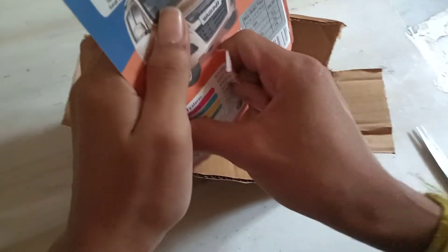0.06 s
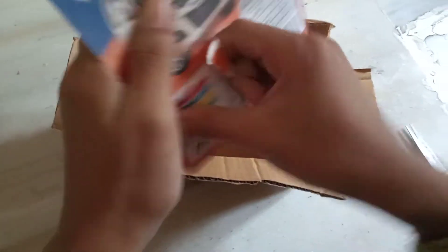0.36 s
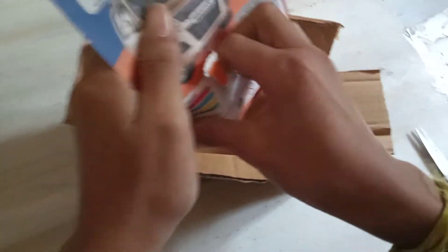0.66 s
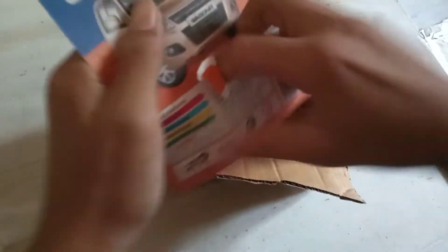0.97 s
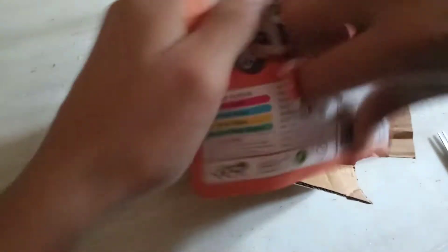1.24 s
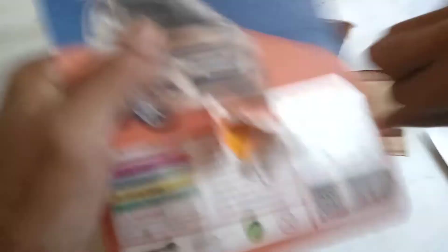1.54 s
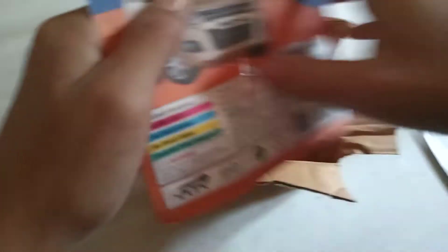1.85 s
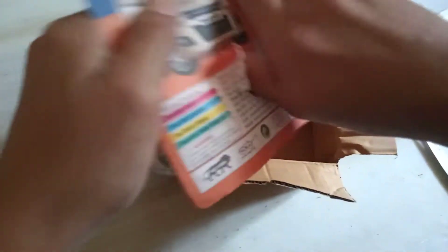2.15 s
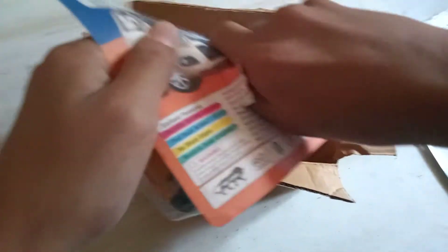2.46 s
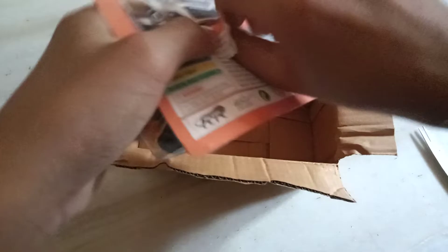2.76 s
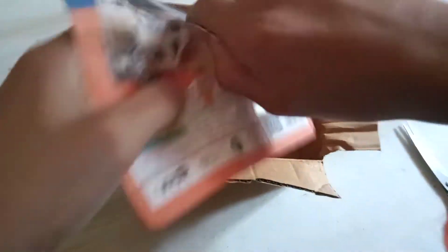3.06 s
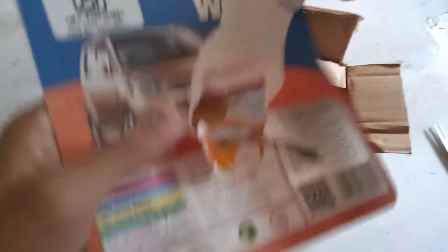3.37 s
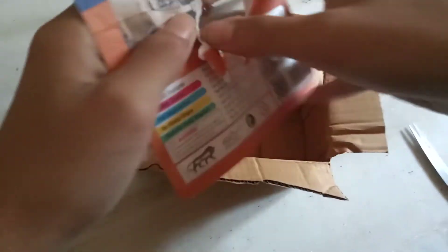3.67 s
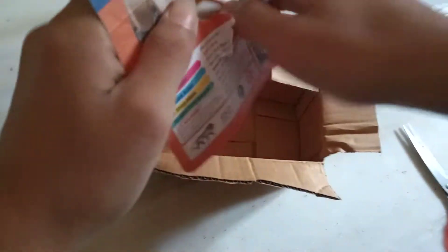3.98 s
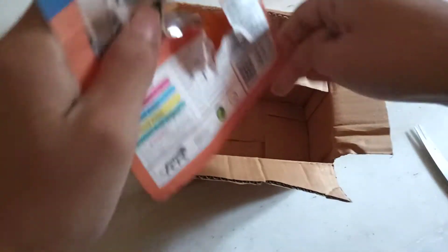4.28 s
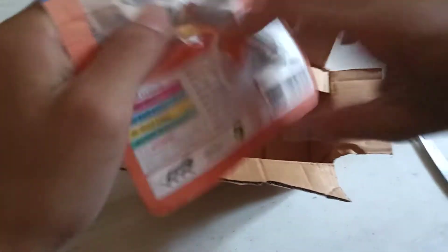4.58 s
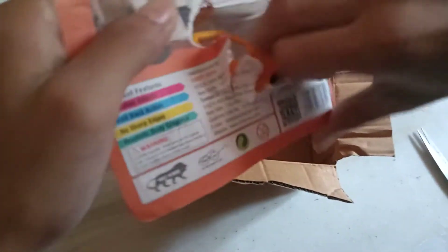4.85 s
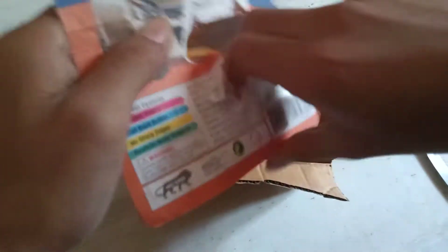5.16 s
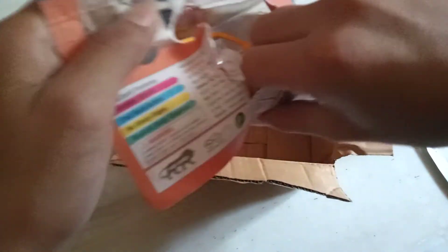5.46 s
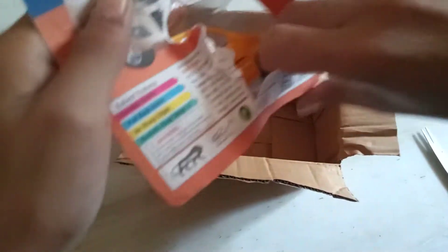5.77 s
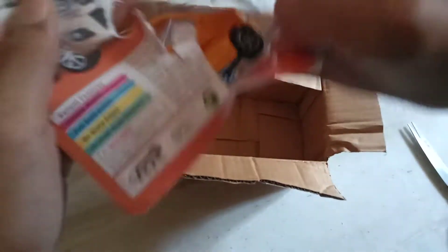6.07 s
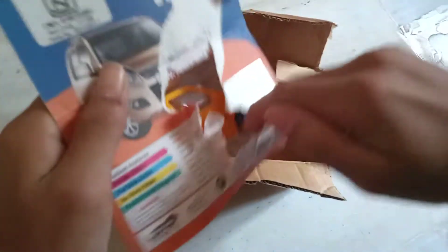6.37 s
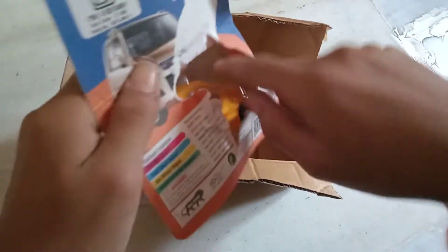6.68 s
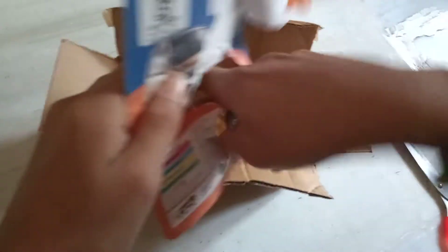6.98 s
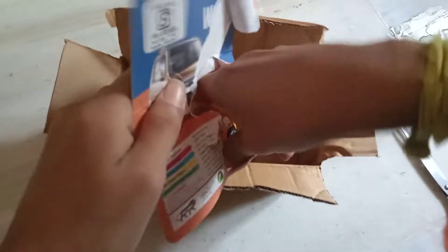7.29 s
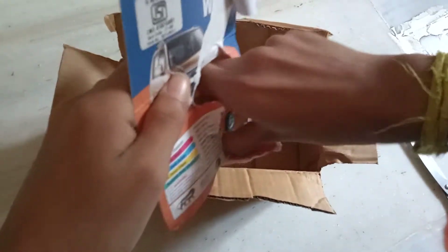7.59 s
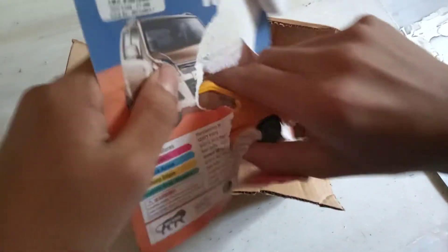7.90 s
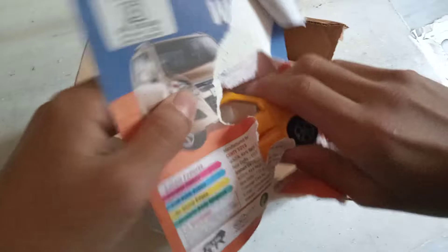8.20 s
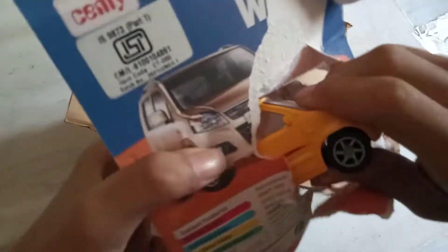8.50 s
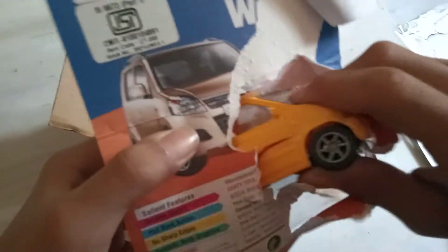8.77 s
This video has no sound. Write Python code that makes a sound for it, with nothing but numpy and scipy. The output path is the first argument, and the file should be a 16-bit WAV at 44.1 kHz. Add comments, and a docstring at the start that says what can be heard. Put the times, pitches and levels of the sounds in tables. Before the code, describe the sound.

Thin plastic packaging crackles and pops as its card backing is ripped in short pulls, with fingers rubbing and tapping throughout.

```python
"""A small room: hands tear open a toy's blister pack close to a phone.
The plastic shell buckles in sharp snaps and tiny crinkles as creases pop through.
The backing card rips in short runs of breaking fibres, the finest of them fizzing.
Fingers rub, bump and tap the pack throughout. Bare walls answer the shell and the card,
and the microphone adds a faint hiss."""
import sys
import numpy as np
from scipy import signal
from scipy.fft import rfft, irfft
from scipy.io import wavfile
from scipy.ndimage import uniform_filter1d, minimum_filter1d, map_coordinates

SR = 44100
rng = np.random.default_rng(int(sys.argv[2]) if len(sys.argv) > 2 else 0)


def wav_out(sig):
    """Save sig, one row per channel (or a flat mono array), as 16-bit PCM at SR to the path in sys.argv[1]."""
    wavfile.write(sys.argv[1], SR, np.round(np.clip(np.atleast_2d(sig).T, -1, 1) * 32767).astype(np.int16))


N = 398619
FFT_SIZE = 4096
HZ = np.fft.rfftfreq(FFT_SIZE, 1 / SR) + 1
MID_PANEL_HZ = 1500

# Each row: start in seconds, level in dB, panel pitch in Hz, thump in dB, crispness in dB.
SHELL_SNAPS = [(0.334, -24.5, 724, 14, 7), (0.4445, -26.5, 1730, 12, 3), (0.4766, -12.5, 2670, 9.5, 32.5),
               (0.623, -14.5, 2290, -7.5, 9.5), (0.6752, -19.5, 1910, 17, 14),
               (0.9899, -17, 1680, 15, -11.5), (1.0263, -15.5, 2080, 3, -18), (1.082, -20.5, 1420, 14, -17),
               (1.2542, -15.5, 1090, 14, -8.5), (1.446, -12, 2260, 8.5, 15.5), (1.509, -10, 1344, 22, 15),
               (1.6214, -21.5, 3170, 3.5, -7), (1.7637, -19.5, 706, 5.5, 2.5),
               (1.9975, -15.5, 1804, 13, -3), (2.049, -18, 3170, 0, -17.5), (2.3725, -18.5, 2650, 13.5, 13),
               (2.397, -16, 1520, 12, 17), (2.4371, -9.5, 2580, -2, 5), (2.6223, -8.5, 650, -2.5, -1.5),
               (2.7257, -14.5, 3090, -1.5, 15.5), (2.7463, -11, 3350, 6, 7.5), (2.9986, -16.5, 1250, 17, 2),
               (3.0611, -20.5, 2650, -2, 19.5), (3.1153, -13, 1680, -20.5, 14),
               (3.1522, -7.5, 2070, 11.5, -8), (3.3011, -1, 1964, 19.5, 18), (3.325, -11, 1440, 20.5, 11.5),
               (3.5235, -30.5, 690, 13, 24.5), (3.8517, -13.5, 1430, 6, -6),
               (3.8664, -20, 1420, -3.5, -5.5), (4.0205, -14, 908, -1.5, -20.5),
               (4.2693, -17, 1320, 1, 12.5), (4.296, -18, 1800, 24.5, 8.5), (4.378, -17, 1330, 6, 4.5),
               (4.416, -17.5, 1190, -12, -2), (4.614, -24, 1240, 4, -3), (4.695, -17, 1440, 9.5, -4),
               (4.7065, -6.5, 1510, 11, 6), (4.7249, -12.5, 864, 14.5, 9), (4.8648, -15, 2550, 10, 5.5),
               (4.8904, -17, 1087, 3.5, -4.5), (4.909, -11.5, 1310, 13, 7), (5.2731, -15, 1100, 9, -3),
               (5.521, -10.5, 2740, -0.5, 7), (5.6353, -26.5, 1910, 1.5, 26), (5.741, -18, 1820, 0, -1),
               (5.7746, -14.5, 1703, -5, 29.5), (5.893, -26, 1190, -11, -5), (5.986, -17.5, 2590, -3.5, 33),
               (6.0397, -14.5, 1947, 24.5, 33), (6.056, -11.5, 1770, 22.5, 16.5),
               (6.176, -16.5, 1100, 13, 18.5), (6.2603, -22.5, 2530, -2.5, 10),
               (6.3736, -17, 1540, -15, -20), (6.5242, -19, 1170, 12, 13.5), (6.5644, -4.5, 1510, -10, -4),
               (6.73, -7, 1350, -2, -3), (7.0272, -12.5, 1070, 11, 8), (7.4111, -17, 3070, 4, 14),
               (7.7302, -11, 2660, 1, 19), (7.9069, -21, 2760, 6, -36), (8.011, -21.5, 2220, -2, 5),
               (8.3785, -17, 850, 23.5, 2), (8.4144, -19.5, 2150, 13, 18), (8.606, -11, 1450, 6.5, -13),
               (8.984, -13.5, 3070, 9, -14), (9.0293, -13, 1030, 11, 10)]


def snaps(lead_s=0.0077, creak_db=-26, mid_ring_s=0.03):
    """The shell creaks faintly under the thumbs, then gives way. Bigger, lower panels ring longer."""
    out = np.zeros((2, N))
    for start_s, level_db, pitch_hz, thump_db, crisp_db in SHELL_SNAPS:
        tearing = any(pull_s <= start_s <= pull_s + length_s for pull_s, length_s, _, _ in CARD_PULLS)
        run_on = 1.33 if tearing else 1  # the crack runs on through the card
        ring_s = mid_ring_s * (MID_PANEL_HZ / pitch_hz) ** 0.52 * run_on
        snap = amp(level_db) * buckle(pitch_hz, thump_db, crisp_db, ring_s)
        add(out, start_s - lead_s, amp(creak_db) * snap)
        add(out, start_s, snap)
    return out


# Plastic shell response. Each row: frequency in Hz, relative gain in dB.
SHELL_SPECTRUM = [(40, -40.5), (140, -12), (400, -3), (600, -2.5), (850, 6), (1800, 5), (2850, -7),
                  (3500, -11.5), (4800, -31), (7000, -61.5), (10700, -55), (13500, -69), (15500, -80)]


def buckle(pitch_hz, thump_db, crisp_db, ring_s, travel_s=0.000574):
    """A crease pops through; its bending waves scatter round the shell. Energy of 10 ms at rms 1."""
    t = np.arange(FFT_SIZE) / SR
    scatter = rng.standard_normal((2, FFT_SIZE)) * amp(-60 * t / ring_s)
    push = 1.035 * unit(scatter) / np.sqrt(FFT_SIZE)
    push[1] /= 2  # into the room, scatter evens out over all directions
    push[:, 0] += 1  # the pop itself
    treble_db = crisp_db / (1 + (4200 / HZ) ** 3)
    colour_db = along(SHELL_SPECTRUM, HZ) + panel(pitch_hz, thump_db) + treble_db
    # travel time falls with the root of frequency
    dispersion = np.exp(-4j * np.pi * travel_s * np.sqrt(HZ * pitch_hz))
    snap = irfft(rfft(push) * rfft(radiate(colour_db, ripple_db=4.0)) * dispersion)
    return snap / np.linalg.norm(snap, axis=1, keepdims=True) * np.sqrt(0.01 * SR)


# Each row: start in seconds, length in seconds, level in dB, pitch of the flexing card in Hz.
CARD_PULLS = [(0.092, 0.075, -35, 1970), (0.679, 0.11, -32, 2170), (0.965, 0.105, -28, 1720),
              (1.211, 0.12, -29.5, 1230), (1.514, 0.095, -28, 3160), (1.649, 0.032, -23, 1340),
              (1.876, 0.028, -24, 1170), (1.975, 0.054, -23, 1530), (2.096, 0.043, -39, 1520),
              (2.384, 0.029, -24.5, 2680), (2.76, 0.125, -38, 3050), (3.145, 0.02, -17.5, 1100),
              (3.294, 0.108, -20, 1990), (3.641, 0.028, -29, 1250), (3.703, 0.05, -39, 1560),
              (4.102, 0.045, -27, 1850), (4.232, 0.083, -23, 2100), (4.362, 0.068, -26.5, 1430),
              (4.694, 0.13, -26, 1260), (4.845, 0.155, -23, 1190), (5.042, 0.1, -32, 1520),
              (5.222, 0.075, -27.5, 1280), (6.04, 0.077, -21, 2240), (6.525, 0.1, -24.5, 1520),
              (6.709, 0.063, -24, 1440), (6.952, 0.19, -37, 3100), (7.079, 0.055, -27.5, 2930),
              (7.309, 0.12, -28, 1510), (7.741, 0.12, -31, 3000), (8.219, 0.034, -36.5, 1900),
              (8.369, 0.074, -24, 2910), (8.441, 0.12, -28, 2720), (8.914, 0.08, -17, 3130)]
# Backing card response. Each row: frequency in Hz, relative gain in dB.
CARD_SPECTRUM = [(40, -33), (80, -15.5), (180, -8), (400, -6.5), (600, -6.5), (900, 3.5), (1800, 0),
                 (3000, -12), (4000, -25), (6500, -60.5), (10700, -61), (13500, -83)]


def rips(usual_db=-28, grip_s=0.024):
    """Three fibre bundles per pull break in uneven runs, each shaking its own patch of card."""
    out = np.zeros((2, N))
    for start_s, length_s, level_db, pitch_hz in CARD_PULLS:
        pull = pull_force(length_s, grip_s)
        effort_db = level_db - usual_db
        count, rip = len(pull), 0
        for _ in range(3):
            patch_hz = pitch_hz * np.exp(0.14 * rng.standard_normal())
            patch_db = panel(patch_hz, thump_db=10 + 0.3 * effort_db, peak_db=4.5)
            catching = amp(7.9 * np.clip(wobble(90.1, count), -1.5, 1.3))
            fibres = pull * catching * fractures(count, rate_hz=240, spread_db=3)
            response = radiate(along(CARD_SPECTRUM, HZ) + patch_db, ripple_db=7.0)
            rip = rip + signal.fftconvolve(fibres[None], response, axes=1)
        rip *= np.sqrt(length_s * SR) / (np.linalg.norm(rip[0]) + 1e-9)
        onset_s = start_s - grip_s / 2
        add(out, onset_s, amp(level_db) * rip)
        taut_db = 3.5 * np.log2(pitch_hz / MID_PANEL_HZ)  # taut card sounds higher and fizzes more
        fizz_db = usual_db - 46 + 0.9 * effort_db + taut_db
        add(out, onset_s, amp(fizz_db) * pull * fizz(count))
    return out


def pull_force(length_s, grip_s, release_s=0.024, sag_db=3):
    """One pull takes hold, sags as the card gives way, and lets go."""
    t = np.arange(round((length_s + (grip_s + release_s) / 2) * SR)) / SR
    hold = np.clip(np.minimum(t / grip_s, (t[-1] - t) / release_s), 0, 1)
    return hold ** 2 * amp(-sag_db * t / length_s)


# Finest fibres. Each row: frequency in Hz, relative gain in dB.
FIZZ_SPECTRUM = [(1500, -30), (4200, 12), (5500, -1), (7000, -5), (10500, -1.5), (12000, -7.5),
                 (14000, -18.5)]


def fizz(count):
    """The finest fibres break in a dense, bright crackle under the tear."""
    breaks = fractures(count, rate_hz=2500, spread_db=6)
    crackle = filtered(breaks, along(FIZZ_SPECTRUM, HZ))
    return unit(crackle * amp(4 * wobble(70, count)))


# Finger activity. Each row: time in seconds, bumping in relative dB, rubbing in relative dB.
GRIP_LEVELS = [(0.0, -57, -40), (0.2, -61, -46.5), (1.66, -50, -35.5), (2.11, -60, -37), (3.15, -67.5, -39),
               (3.55, -47, -46), (3.8, -47.5, -42.5), (4.23, -57, -32.5), (4.58, -57.5, -45.5),
               (4.91, -52.5, -29.5), (5.36, -53.5, -42), (5.64, -60, -37), (6.59, -41.5, -41.5),
               (7.15, -63, -44), (8.31, -50, -40.5), (8.51, -53, -40), (8.74, -54, -44.5), (9.04, -49, -40)]
# Soft bumps on the pack. Each row: frequency in Hz, relative gain in dB.
BUMP_SPECTRUM = [(25, -35), (75, -3.5), (170, 1.5), (420, -0.5), (800, -51.5), (4000, -100)]


def fingers():
    """Skin creeps over the card in small slips and bumps it softly."""
    times_s, *levels_db = np.transpose(GRIP_LEVELS)
    bump_db, rub_db = (np.interp(np.arange(N) / SR, times_s, db) for db in levels_db)
    slips = fractures(N, rate_hz=6200, spread_db=2.0) * amp(4.9 * wobble(22))
    rub = filtered(slips, along(CARD_SPECTRUM, HZ) + panel(1700, thump_db=0.13, peak_db=-1))
    pressure = rng.standard_normal(N) * amp(7.9 * wobble(26))
    bump = filtered(pressure, along(BUMP_SPECTRUM, HZ))
    return amp(rub_db - 3.5) * unit(rub) + amp(bump_db + 4) * unit(bump)


def crinkles(count=210):
    """Tiny creases pop at random, louder when the grip is restless."""
    out = np.zeros((2, N))
    times_s, _, rub_db = np.transpose(GRIP_LEVELS)
    starts_s = rng.uniform(0, N / SR, count)
    deviations = np.clip(rng.standard_normal((count, 3)), -1.5, 1.5)
    for start_s, (size, pitch, thump) in zip(starts_s, deviations):
        level_db = np.interp(start_s, times_s, rub_db) + 1.5 + 5 * size
        crease = buckle(1200 * np.exp(0.3 * pitch), 8 + 6 * thump, crisp_db=6.5, ring_s=0.028)
        add(out, start_s, amp(level_db) * crease)
    return out


def taps(count=130, pack_hz=206, ring_cycles=17):
    """Fingertips land softly; the held pack answers each with a short low note of varying pitch."""
    out, t = np.zeros(N), np.arange(FFT_SIZE) / SR
    times_s, bump_db, _ = np.transpose(GRIP_LEVELS)
    starts_s = rng.uniform(0, N / SR, count)
    deviations = np.clip(rng.standard_normal((count, 2)), -1.8, 1.8)
    for start_s, (size, pitch) in zip(starts_s, deviations):
        cycles = pack_hz * np.exp(0.48 * pitch) * t
        envelope = (1 - np.exp(-cycles)) * amp(-60 * cycles / ring_cycles)
        note = np.sin(2 * np.pi * cycles) * envelope
        level_db = np.interp(start_s, times_s, bump_db) + 10 + 4 * size
        add(out, start_s, amp(level_db) * note / np.abs(note).max())
    return out


# Room decay. Each row: frequency in Hz, time to fall 60 dB in seconds.
ROOM_T60 = [(150, 0.55), (1500, 0.28), (4000, 0.67), (10000, 0.083)]
# Colour of the echo. Each row: frequency in Hz, relative gain in dB.
WALL_SPECTRUM = [(200, -0.5), (800, -1.5), (3300, -4), (4400, -1.5), (6500, -2.5)]


def room(sound, build_s=0.0099, steps=30):
    """Bare walls answer, each frequency dying at its own rate; echo paths change as the pack moves."""
    out, hop = np.zeros(N), N // steps
    for centre in range(0, N + hop, hop):
        span = np.arange(max(centre - hop, 0), min(centre + hop, N))
        crossfade = np.cos(np.pi / 2 * (span - centre) / hop) ** 2
        hz, t, noise = signal.stft(rng.standard_normal(SR * 2 // 3), SR, nperseg=256)
        decay_db = along(WALL_SPECTRUM, hz)[:, None] - 60 * t / along(ROOM_T60, hz)[:, None]
        envelope = (1 - np.exp(-t / build_s)) * amp(decay_db)
        tail = signal.istft(noise * envelope, SR, nperseg=256)[1]
        echo = signal.fftconvolve(sound[span] * crossfade, tail / np.linalg.norm(tail))
        add(out, span[0] / SR, echo)
    return out


def hiss(level_db=-84.5):
    """The microphone's own faint, steady noise."""
    return amp(level_db) * unit(signal.lfilter([1], [1, -0.6], rng.standard_normal(N)))


def panel(pitch_hz, thump_db, peak_db=10, width_octaves=0.55, thump_hz=550):
    """Gain in dB of a flexing patch: one broad resonance, plus a low push from the whole pack."""
    resonance_db = peak_db * np.exp(-(np.log2(HZ / pitch_hz) / width_octaves) ** 2)
    return resonance_db + thump_db / (1 + (HZ / thump_hz) ** 4)


def radiate(colour_db, ripple_db, spacing_hz=130):
    """Two responses: to the phone, rippled by modes that shift with every bend; to the room, smooth."""
    modes = map_coordinates(rng.standard_normal(FFT_SIZE // 8), [HZ / spacing_hz], mode="wrap")
    direct_db = colour_db + ripple_db * np.clip(modes, -2, 1)
    return minimum_phase(np.array([direct_db, colour_db]))


def fractures(count, rate_hz, spread_db):
    """Tiny impulses of random time, sign and size."""
    breaks = rng.random(count) < rate_hz / SR
    size = np.clip(rng.standard_normal(count), -2, 2)
    return breaks * rng.choice([-1, 1], count) * amp(spread_db * size)


def wobble(rate_hz, count=N):
    """Smooth random curve with rate_hz knots per second."""
    knots = rng.standard_normal(int(count * rate_hz / SR) + 4)
    return map_coordinates(knots, [np.arange(count) * rate_hz / SR])


def minimum_phase(gain_db):
    """Shortest impulse response with this gain on the HZ grid."""
    cepstrum = irfft(np.log(amp(gain_db) + 1e-6))
    cepstrum[..., 1:FFT_SIZE // 2] *= 2
    cepstrum[..., FFT_SIZE // 2 + 1:] = 0
    return irfft(np.exp(rfft(cepstrum)))


def filtered(sound, gain_db):
    return signal.fftconvolve(sound, minimum_phase(gain_db))[:len(sound)]


def along(points, hz):
    """Interpolate (Hz, value) points on a log frequency axis."""
    knots_hz, values = np.transpose(points)
    return np.interp(np.log(hz + 1), np.log(knots_hz), values)


def add(track, start_s, sound):
    i = max(round(start_s * SR), 0)
    track[..., i:i + sound.shape[-1]] += sound[..., :max(N - i, 0)]


def amp(db):
    return 10 ** (np.asarray(db) / 20)


def unit(x):
    return x / np.sqrt(np.mean(x ** 2) + 1e-20)


def scene():
    """The pack in the hands and the room around it, in mono."""
    shell, shell_to_room = snaps() + crinkles()
    card, card_to_room = rips()
    to_room = amp(-15.0) * shell_to_room + amp(-15.5) * card_to_room
    return (shell + card + fingers() + taps() + hiss() + room(to_room))[None]


def record(dry, ceiling=0.92, top_hz=15700):
    """The phone's limiter holds the loudest snaps down; nothing passes above its band limit."""
    needed = np.minimum(1, ceiling / (np.abs(dry) + 1e-9))
    gain = minimum_filter1d(needed, size=441)  # 10 ms hold
    for _ in range(2):
        gain = uniform_filter1d(gain, size=221)
    passband = np.fft.rfftfreq(N, 1 / SR) < top_hz
    return irfft(rfft(dry * gain) * passband, N)


dry = scene()
out = record(dry)
wav_out(out)
```